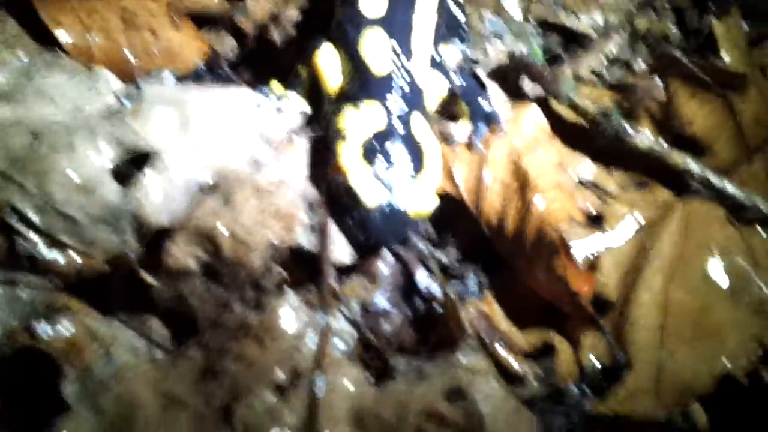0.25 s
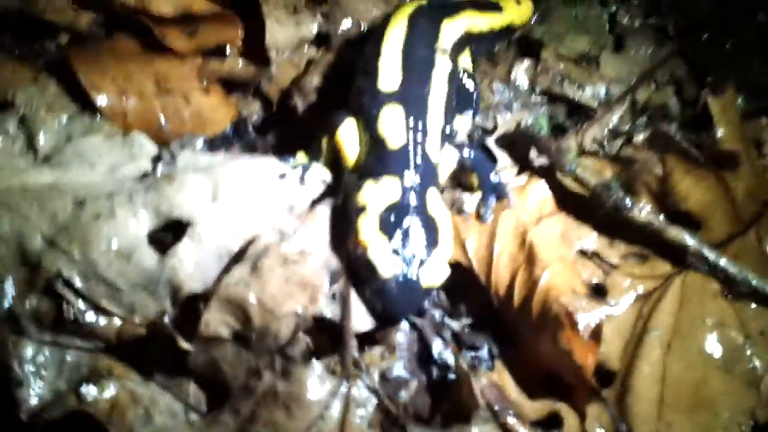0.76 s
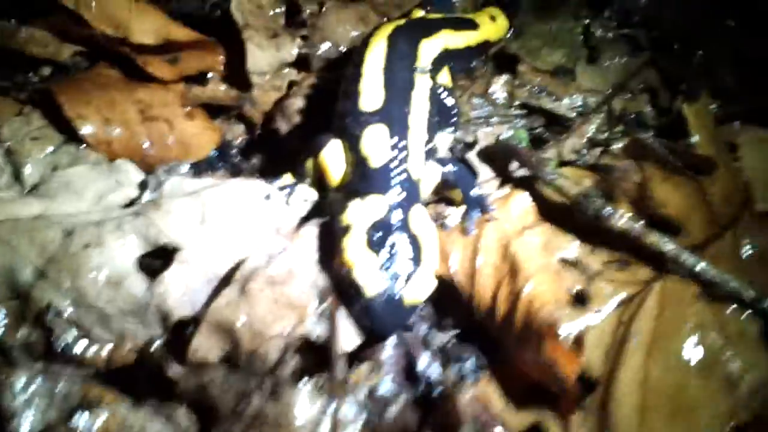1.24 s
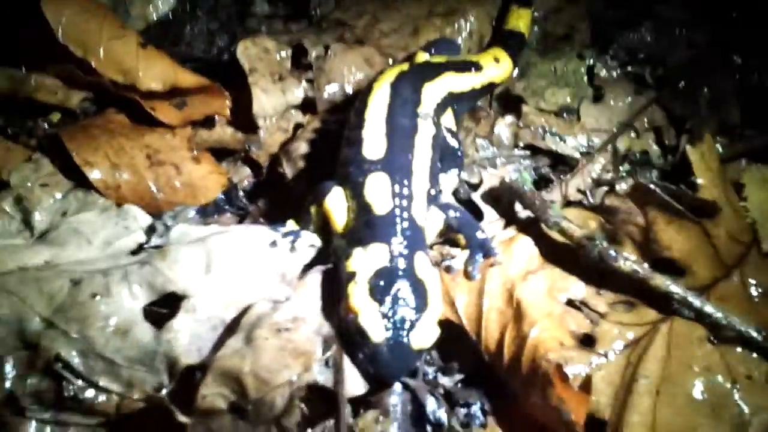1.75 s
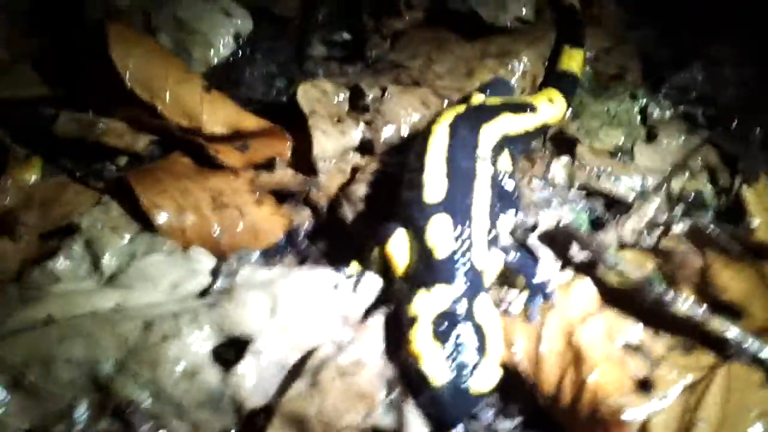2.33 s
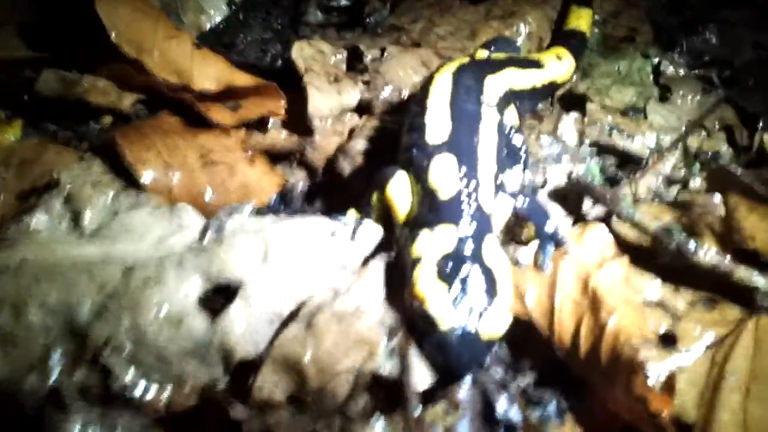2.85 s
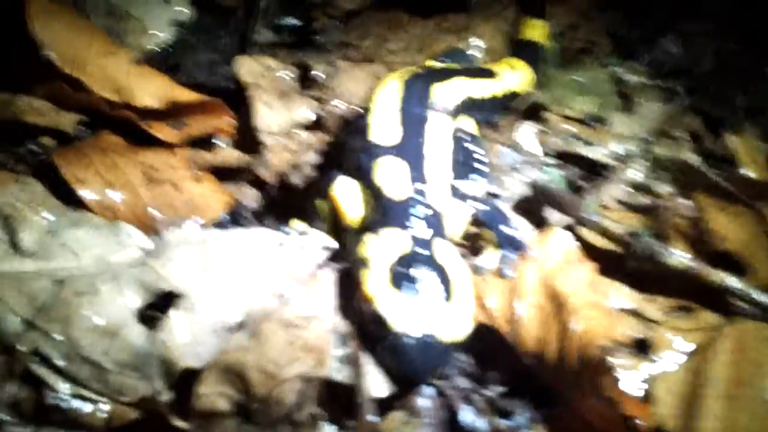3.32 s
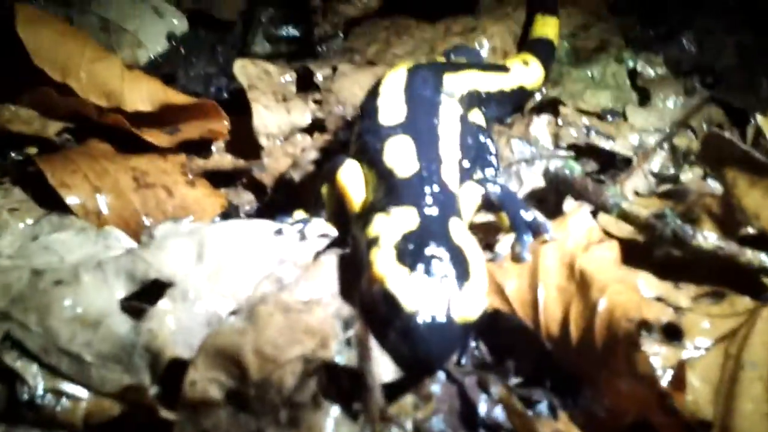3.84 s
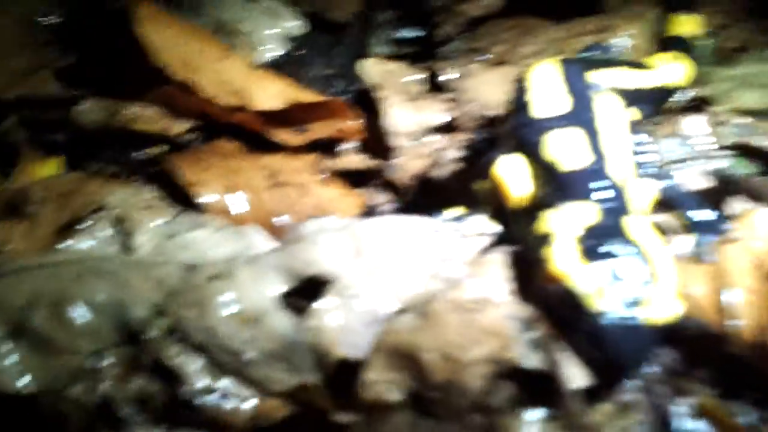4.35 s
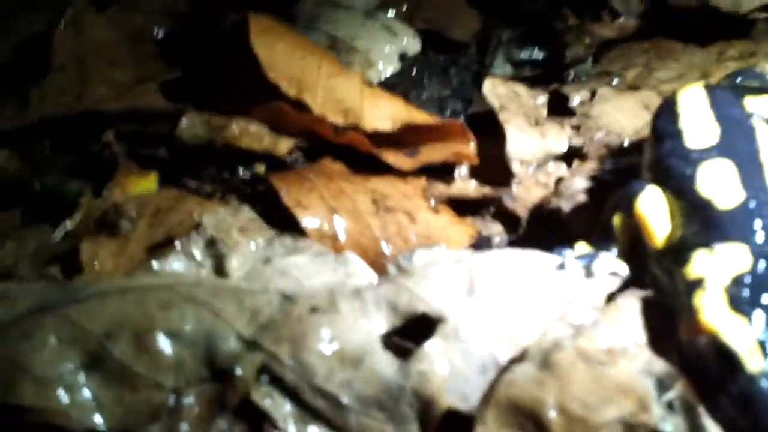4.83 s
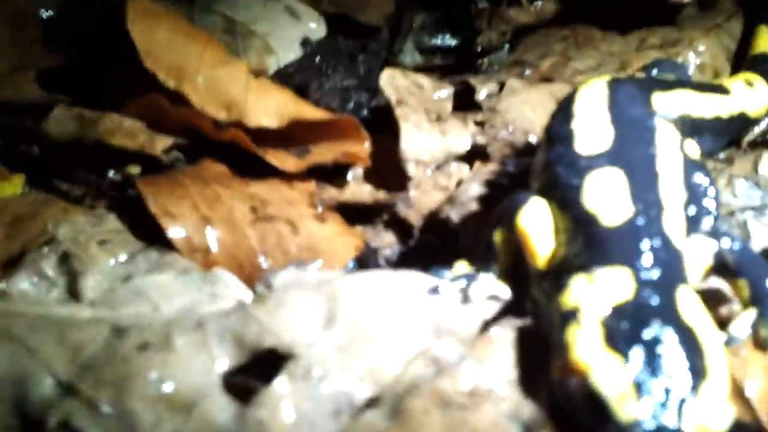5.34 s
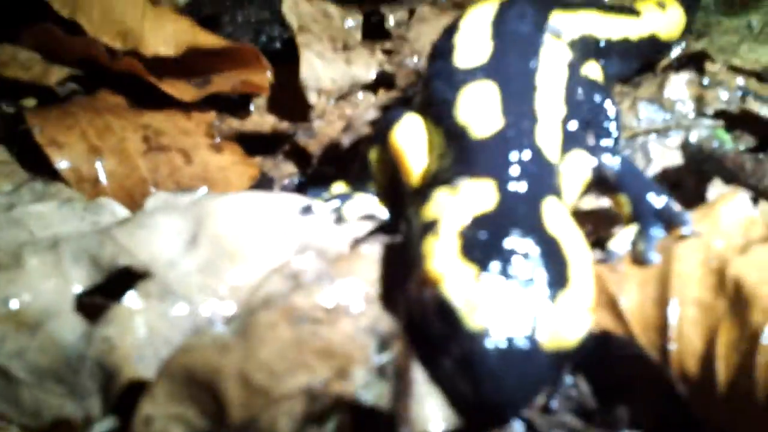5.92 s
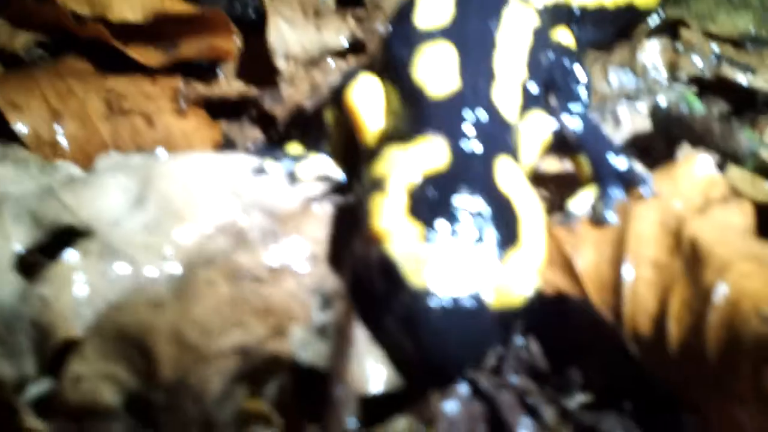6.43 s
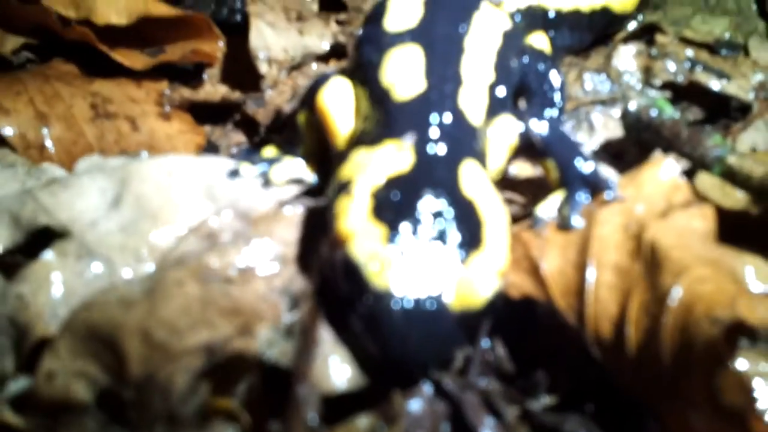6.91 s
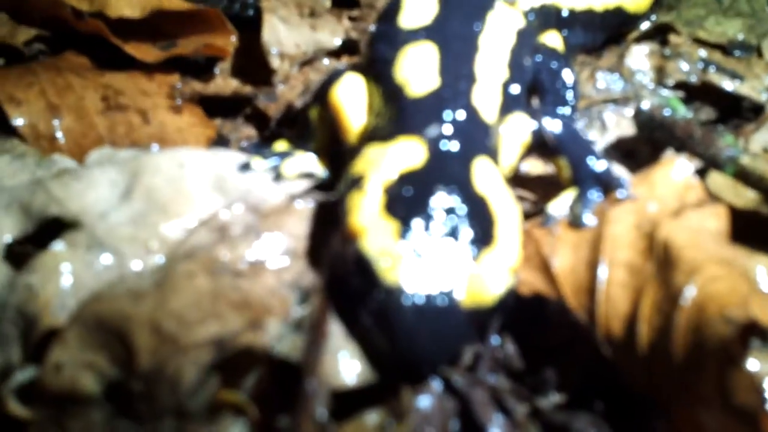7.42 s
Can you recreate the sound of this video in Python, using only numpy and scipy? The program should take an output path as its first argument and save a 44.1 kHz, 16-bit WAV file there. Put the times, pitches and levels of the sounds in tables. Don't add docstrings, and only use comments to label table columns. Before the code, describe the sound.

Night rain on soaked leaf litter, crisp near drip ticks and small splashes over low rumble, interrupted once by a finger bumping the microphone.

```python
import sys
import numpy as np
from scipy import signal
from scipy.fft import rfft, irfft, next_fast_len
from scipy.io import wavfile
from scipy.ndimage import uniform_filter1d

SR = 44100
rng = np.random.default_rng(int(sys.argv[2]) if len(sys.argv) > 2 else 0)


def to_wav(s):
    ch = np.atleast_2d(s).T
    pcm = np.round(np.clip(ch, -1, 1) * 32767)
    wavfile.write(sys.argv[1], SR, pcm.astype(np.int16))


def boost(x):
    u = np.asarray(x, float) / 20
    return 10 ** u


N = 338247
KNOCK_S = 3.9092


def evened(x):
    return x / np.sqrt(np.mean(x ** 2) + 1e-20)


def peaked(x):
    return x / (abs(x).max() + 1e-12)


def read(points, hz):
    f, value = np.transpose(points)
    return np.interp(np.log(hz + 1), np.log(f + 1), value)


def coloured(x, points):
    size = next_fast_len(len(x))
    gain = boost(read(points, np.fft.rfftfreq(size, 1 / SR)))
    return irfft(rfft(x, size) * gain, size)[:len(x)]


def band(x, lo_hz, hi_hz):
    return signal.sosfilt(signal.butter(2, [lo_hz, hi_hz], "bandpass", fs=SR, output="sos"), x)


def add(mix, s, sound):
    part = mix[round(s * SR):][:len(sound)]
    part += sound[:len(part)]


def add_all(mix, rows, sound, t60):
    for (s, *row), noise in zip(rows, rng.standard_normal((len(rows), 2000))):
        add(mix, s, sound(*row, t60, noise))


def slow(seconds):
    size = max(int(seconds * SR), 2)
    once = uniform_filter1d(rng.standard_normal(N), size)
    return evened(uniform_filter1d(once, size))


def grains(per_s, spread_db, t60):
    hits = rng.random(N) < per_s / SR
    size = boost(spread_db * np.minimum(rng.exponential(1, N), 3.8)) * hits
    fall = boost(-2 * 60 / (t60 * SR))
    power = signal.lfilter([1], [1, -fall], size ** 2)
    return evened(np.sqrt(power) * rng.standard_normal(N))


def layer(points, far_db, near, flicker_db, flicker_s):
    mix = boost(far_db) * rng.standard_normal(N) + near
    return evened(coloured(mix, points) * boost(flicker_db * slow(flicker_s)))


def rain():
    # time in seconds, strength of the rainfall in dB.
    rainfall = [(0.0, -44), (0.47, -42.5), (1.07, -44), (1.62, -41), (1.77, -41), (2.48, -43.5),
                (3.16, -41), (3.59, -42.5), (3.84, -41.5), (4.27, -43.5), (5.02, -43), (5.28, -42.5),
                (5.77, -44), (6.19, -42), (6.69, -43.5), (7.67, -43.5)]
    # time in seconds, how hard runoff from the trees drums the ground in dB.
    drumming = [(0.0, -50.5), (0.68, -53), (0.98, -47.5), (1.13, -51), (1.73, -53), (1.96, -48), (2.8, -53),
                (3.44, -49), (3.65, -50.5), (4.36, -48.5), (5.47, -47.5), (5.64, -46), (6.41, -50.5),
                (7.67, -50)]
    # time in seconds, push of the air on the microphone in dB.
    wind = [(0.0, -51), (0.32, -44.5), (0.7, -52.5), (0.83, -44.5), (1.34, -50.5), (1.86, -53),
            (2.6, -48.5), (2.97, -51), (3.93, -47), (4.34, -50), (4.83, -50.5), (5.23, -47.5), (5.47, -48),
            (5.72, -47), (6.71, -53.5), (6.94, -51.5), (7.37, -46.5), (7.67, -42.5)]
    # pitch in Hz, strength in dB per Hz.
    rumble_colour = [(14, -34.5), (27, -9), (45, -2.5), (80, -0.5), (105, -7.5), (140, -33.5)]
    ground_colour = [(85, -28), (115, -2), (140, 1.5), (182, -7.5), (289, -11), (400, -13), (520, -13),
                     (800, -23.5), (1100, -56.5)]
    sway_colour = [(12, -19.5), (20, -0.5), (32, -0.5), (50, -3), (75, -30.5)]
    patter_colour = [(300, -20), (700, -4), (1200, -2), (2200, 0), (3200, -1.5), (4500, -19.5)]
    hiss_colour = [(2200, -25.5), (3200, -5.5), (4000, 0.5), (4800, -1.5), (6000, 0.7), (7000, -1.5),
                   (8000, -6)]
    steady_db = -44
    rumble_db, ground_db, sway_db, patter_db, hiss_db = -42, -42, -46, -48.5, -42
    wind_follows, ground_follows, patter_follows, hiss_follows = 0.78, 0.94, 0.79, 1.08
    t = np.arange(N) / SR
    more_rain_db, more_drum_db, more_wind_db = (
        np.interp(t, *np.transpose(c)) - steady_db for c in (rainfall, drumming, wind))
    turned = t > KNOCK_S

    drops = grains(120, spread_db=4.0, t60=0.013)
    rumble = layer(rumble_colour, 7.2, grains(18, spread_db=2.5, t60=0.095), flicker_db=2.0, flicker_s=0.049)
    ground = layer(ground_colour, 10.5, grains(25, spread_db=1.0, t60=0.041), flicker_db=1.46, flicker_s=0.046)
    leaf_drops = drops + 0.59 * grains(90, spread_db=3.5, t60=0.012)
    patter = layer(patter_colour, 5.1, leaf_drops, flicker_db=1.05, flicker_s=0.031)
    fine_drops = drops + 1.2 * grains(160, spread_db=-2.5, t60=0.012)
    hiss = layer(hiss_colour, 9.8, fine_drops, flicker_db=0.46, flicker_s=0.018)
    sway = layer(sway_colour, 3, grains(6, spread_db=2.5, t60=0.2), flicker_db=2.5, flicker_s=0.12)

    out = boost(rumble_db + wind_follows * more_wind_db) * rumble
    out = out + boost(ground_db + ground_follows * more_drum_db) * ground
    out = out + boost(sway_db + wind_follows * more_wind_db - 7 * turned) * sway
    out = out + boost(patter_db + patter_follows * more_rain_db - 2 * turned) * patter
    return out + boost(hiss_db + hiss_follows * more_rain_db) * hiss


def thud(peak_db, hz, t60, noise):
    t = np.arange(len(noise)) / SR
    fall = boost(-60 * t / max(t60, 0.003)) * (1 - np.exp(-t / 0.00011))
    rough = evened(band(noise, 0.39 * hz, 2.1 * hz))
    swing = np.sin(2 * np.pi * hz * t + 0.53) + 0.77 * rough
    return boost(peak_db) * peaked(swing * fall)


def tick(peak_db, low_hz, high_hz, low_db, t60, noise):
    dry_per_db = 0.54
    t = np.arange(len(noise)) / SR - 0.0005
    on, t = t > 0, np.maximum(t, 0)
    start = 1 - np.exp(-t / 0.0003)
    t60 = np.clip(t60, 0.012, 0.045)
    weight = boost(2.1 * (low_db + 11))
    wet = t60 / 0.057 * boost(-dry_per_db * max(peak_db + 16, 0))

    rings = weight * np.sin(2 * np.pi * low_hz * t) + np.sin(2 * np.pi * high_hz * t)
    click = band(noise[::-1] * start * boost(-60 * t / 0.003), 1500, 10000)
    snap = peaked(rings * boost(-60 * t / 0.0045) * start) + 0.23 * peaked(click)
    late = int((0.001371 + 0.00033 * np.tanh(noise[0])) * SR)
    snap = snap + 0.27 * np.sign(noise[1]) * np.roll(snap, late)

    beads = noise * on * start * boost(-60 * t / (0.89 * t60))
    spray = weight * band(beads, 0.83 * low_hz, 1.32 * low_hz)
    spray = spray + band(beads, 0.87 * high_hz, 1.353 * high_hz)
    return boost(peak_db) * peaked(snap + wet * peaked(spray))


def near_drops():
    # start in seconds, peak in dB, ring in Hz.
    taps = [(0.0508, -30.5, 2380), (0.1858, -17, 2250), (0.2389, -30, 1800), (0.4125, -20, 2650),
            (0.4617, -27.5, 1940), (0.5881, -30.5, 1200), (0.7793, -31.5, 1780), (0.8676, -26, 2120),
            (0.9477, -26.5, 2030), (1.0695, -25.5, 2020), (1.2398, -23.5, 2380), (1.771, -27.5, 2170),
            (1.9127, -22, 2250), (2.6818, -28.5, 2170), (2.9215, -28.5, 1680), (2.9936, -24.5, 2570),
            (1.6096, -27.5, 2920), (3.193, -29, 2120), (3.2146, -26, 1880), (3.2809, -26, 2500),
            (3.43, -19.5, 2420), (4.5898, -27.5, 1820), (5.1612, -32, 1050), (5.238, -32.5, 1960),
            (6.0433, -24.5, 2330), (6.0761, -29.5, 2600), (6.2078, -32, 1070), (6.3548, -29.5, 1480),
            (6.4467, -28.5, 2500), (7.409, -33, 1670)]
    # start in seconds, peak in dB, ring in Hz.
    thuds = [
        (0.079, -33.5, 377),
        (0.587, -21, 410),
        (0.961, -28, 423),
        (3.351, -29, 579),
        (3.398, -31, 328),
        (4.586, -40, 253),
        (6.0495, -26.5, 330),
        (6.351, -47, 299),
        (6.899, -37.5, 312),
        (7.521, -33.5, 328),
    ]
    # start in seconds, peak in dB, low ring in Hz,
    # high ring in Hz, weight of the low ring in dB.
    ticks = [(0.1856, -16, 2900, 7030, -17), (0.296, -18.5, 4310, 5830, -20),
             (0.4124, -7.5, 3000, 6610, -11.5), (0.4138, -20, 3450, 6660, -7),
             (0.5733, -23, 4690, 5190, -15), (1.0711, -7.5, 4430, 5800, -9.5),
             (1.6162, -9.5, 3920, 5660, -12.5), (2.047, -23.5, 4160, 6100, 2),
             (2.6821, -14.5, 4560, 6300, -30), (2.947, -20.5, 4870, 5560, -23),
             (3.034, -12.5, 4970, 6530, -16), (3.1633, -5, 4650, 5060, -8),
             (3.3489, -14, 4220, 5630, -10.5), (4.03, -19, 4850, 6940, -20),
             (4.6164, -17.5, 4800, 6290, -9.5), (5.069, -20.5, 4660, 5300, -14),
             (5.1606, -25.5, 4500, 5420, -8), (5.2382, -18, 4860, 5730, -15.5),
             (6.076, -15.5, 4000, 6700, -9), (6.2077, -18.5, 4240, 5610, -8),
             (6.2541, -20.5, 3800, 4900, -11), (6.4826, -21, 4570, 5400, -21),
             (7.289, -15.5, 4700, 5430, -11), (7.633, -18, 4870, 6100, -12.5)]
    splashes = [(0.4619, -17.5, 4140, 5800, -12.5), (0.7472, -25, 3900, 5700, -7.5),
                (0.7795, -22, 4100, 5600, -12), (0.8672, -25.5, 4020, 6340, -9.5),
                (0.9488, -24, 3980, 5940, -7.5), (1.6297, -5, 4010, 5660, -12.5),
                (1.7575, -25, 3720, 6160, -22), (1.8761, -12.5, 4600, 5900, -10.5),
                (1.9114, -14, 4020, 6580, -9), (1.9503, -23.5, 3860, 5290, -7.5),
                (2.0964, -21.5, 3860, 5370, -12), (2.7806, -22.5, 4120, 5950, -3),
                (2.9652, -22.5, 3700, 6840, -16.5), (2.9932, -22.5, 4050, 6900, -11.5),
                (3.061, -22, 4400, 5700, -6), (3.4311, -19.5, 4230, 6540, -11),
                (3.7803, -25.5, 3850, 6070, -21), (4.095, -24.5, 3960, 5250, -9.5),
                (5.3008, -24.5, 3250, 5330, -12), (5.523, -23.5, 3860, 6140, -9),
                (6.0486, -23, 2830, 4900, -2), (6.0486, -18.5, 4840, 4900, -12),
                (6.111, -23, 4470, 6440, -12.5), (6.1895, -29.5, 4430, 6380, -11)]
    rebounds = [
        (1.8837, -19.5, 3300, 5600, -15),
        (6.0535, -18, 4300, 6640, -13.5),
    ]
    # start in seconds, peak in dB.
    faint = [(0.2503, -28), (0.326, -29), (0.5964, -25), (0.9326, -27), (1.2395, -33.5), (1.404, -31.5),
             (1.817, -25), (1.9927, -28.5), (2.173, -27), (2.251, -24.5), (2.2698, -26), (2.4124, -24.5),
             (2.614, -30), (2.7236, -27.5), (3.0849, -28), (3.277, -26.5), (3.6292, -27), (4.1212, -28),
             (3.832, -23.5), (4.8397, -26), (5.219, -27), (5.4996, -27), (5.771, -29), (5.782, -24),
             (5.888, -25.5), (6.304, -27.5), (6.3565, -29.5), (6.4464, -32.5), (6.465, -27), (7.1758, -28)]
    # low ring in Hz, high ring in Hz, weight of the low ring in dB.
    faint_rings = (4430, 5950, -12)
    # low ring in Hz, high ring in Hz, weight in dB.
    faint_scatter = (350, 450, 2.1)
    out = np.zeros(N)
    add_all(out, taps, thud, t60=0.014)
    for s, peak_db, hz in thuds:
        add(out, s, thud(peak_db, hz, 6.6 / hz, rng.standard_normal(2000)))
    add_all(out, ticks, tick, t60=0.029)
    differ = np.clip(rng.standard_normal((len(faint), len(faint_rings))), -2, 2)
    leaves = np.array(faint_rings) + differ * np.array(faint_scatter)
    far_splashes = [(*row, *leaf) for row, leaf in zip(faint, leaves)]
    add_all(out, list(splashes) + far_splashes, tick, t60=0.042)
    add_all(out, rebounds, tick, t60=0.021)
    return out


def finger():
    # time in seconds, sliding speed in dB, pressure in dB.
    brush = [
        (3.815, -53, -55),
        (3.834, -34.5, -40),
        (3.87, -36.5, -30.5),
        (3.892, -29.5, -33.5),
        (3.9, -31, -24.5),
        (3.915, -36, -21),
        (3.938, -49.5, -29.5),
        (3.959, -40.5, -39),
        (3.985, -66, -70),
    ]
    # start in seconds, peak in dB, ring in Hz.
    jerks = [
        (3.8965, -17, 700),
        (3.9005, -16, 450),
        (3.904, -13.5, 520),
        (3.9155, -15, 560),
        (3.9335, -20, 480),
        (3.938, -17, 520),
    ]
    # peak in dB, membrane swing in Hz, die-away time in seconds,
    # blow length in seconds, time of letting go in seconds.
    knock = (-2.5, 42, .07, .0016, .012)
    s, *controls = np.transpose(brush)
    slide_db, press_db = (np.interp(np.arange(N) / SR, s, c, -300, -300) for c in controls)
    shove = boost(-37 + 1.26 * (press_db + 35))
    slips = grains(1400, spread_db=3.0, t60=0.035)
    out = boost(slide_db) * evened(band(slips, 2530, 4900))
    out = out + boost(press_db) * evened(band(slips, 420, 4800))
    out = out + shove * evened(band(grains(600, spread_db=5.5, t60=0.015), 110, 590))
    add_all(out, jerks, thud, t60=0.011)

    peak_db, hz, t60, length, release = knock
    u = np.arange(4000) / SR
    swing = np.cos(2 * np.pi * hz * u) * boost(-60 * u / t60) * np.where(u < release, 1, -0.3)
    blow = 0.7 * (u < length)
    add(out, KNOCK_S, boost(peak_db) * peaked(band(blow + 0.6 * swing, 12, 2500)))
    return out


def scene():
    return (rain() + near_drops() + finger())[None]


def unsteady_treble(x):
    hz, t, z = signal.stft(x, SR, nperseg=2048)
    power_db = 10 * np.log10(abs(z) ** 2 + 1e-14)
    bass_db = power_db[(hz > 300) & (hz < 1500)].mean(0)
    bright_db = power_db[(hz > 5000) & (hz < 7200)].mean(0)
    keen = slow(0.11)[np.minimum((t * SR).astype(int), N - 1)]
    edge_hz = np.where(keen > 0.9, 7800, 7560)
    edge_hz = np.where(bright_db > np.median(bright_db) + 3.5, 8000, edge_hz)
    edge_hz = np.where(bass_db > np.median(bass_db) + 20, 7200, edge_hz)
    return signal.istft(z * (hz[:, None] < edge_hz), SR, nperseg=2048)[1][:N]


def roll_off(x):
    return signal.sosfilt(signal.butter(12, 9030, fs=SR, output="sos"), x)


def record(dry):
    # pitch in Hz, gain in dB.
    input_filter = [(6600, 0), (7000, -1), (7300, -5), (7600, -13.5), (7900, -27), (8000, -37.5),
                    (8100, -89)]
    # pitch in Hz, gain in dB.
    mirror_filter = [(7900, -97), (8000, -6.5), (8300, -8), (8700, -21.5), (9000, -39), (9300, -62.5),
                     (9700, -75), (10500, -150)]
    device_hz = 16000
    limited = dry[0] / (1 + abs(dry[0] / 0.75) ** 5) ** (1 / 5)
    x = unsteady_treble(coloured(limited, input_filter))
    folded = 2 * x * np.cos(2 * np.pi * device_hz * np.arange(N) / SR)
    mix = x + coloured(folded, mirror_filter) - 0.0014
    return roll_off(mix[None])


dry = scene()
out = record(dry)
to_wav(out)
```